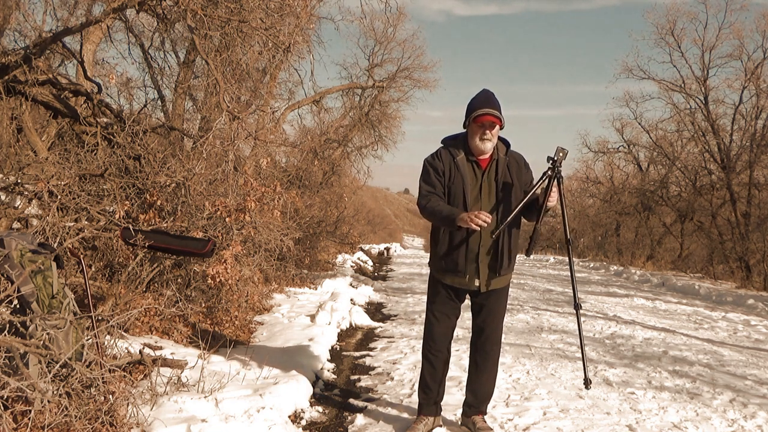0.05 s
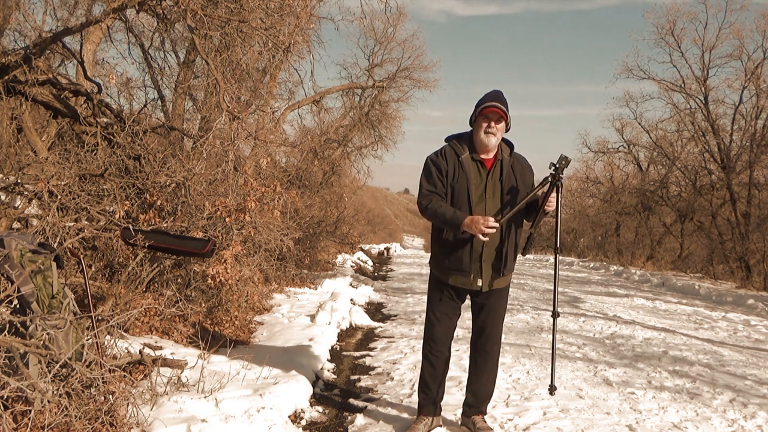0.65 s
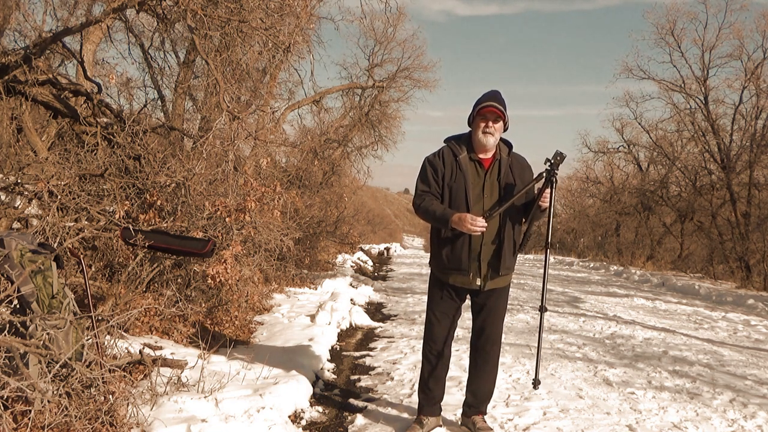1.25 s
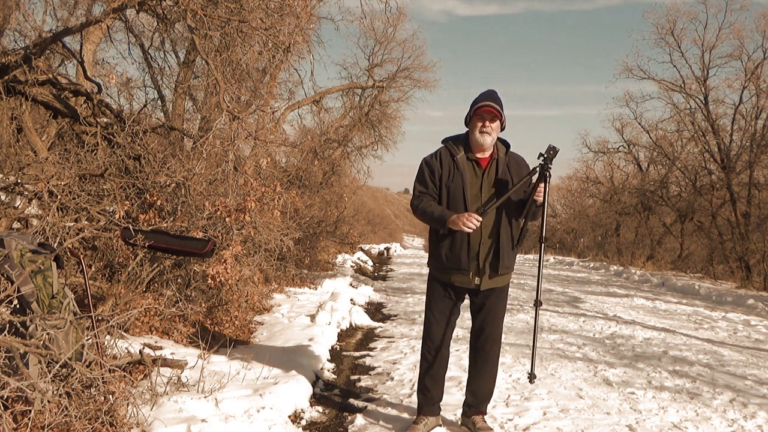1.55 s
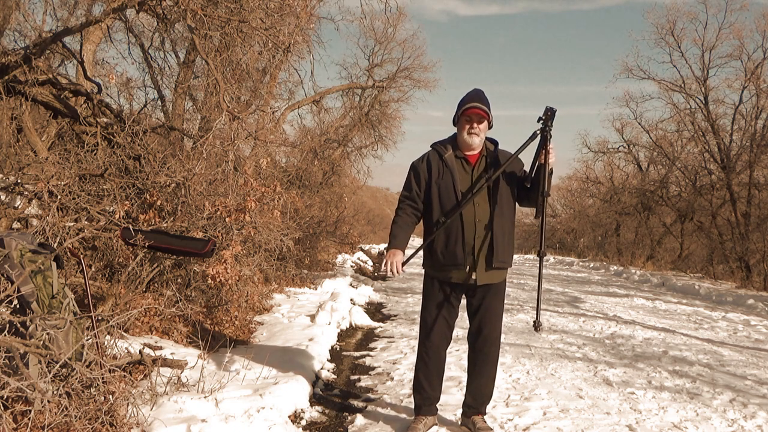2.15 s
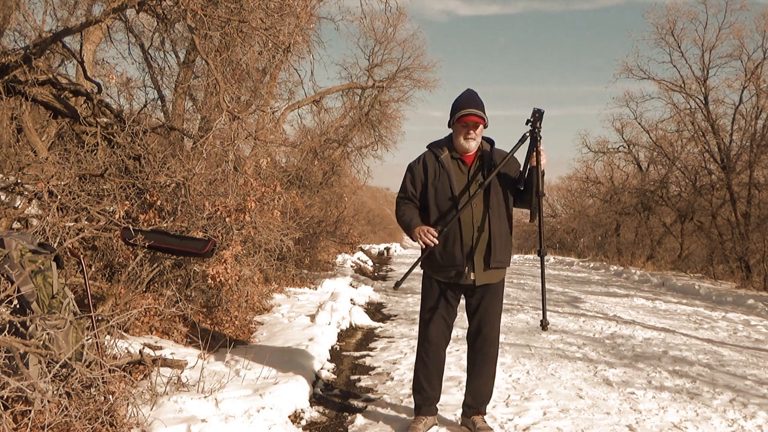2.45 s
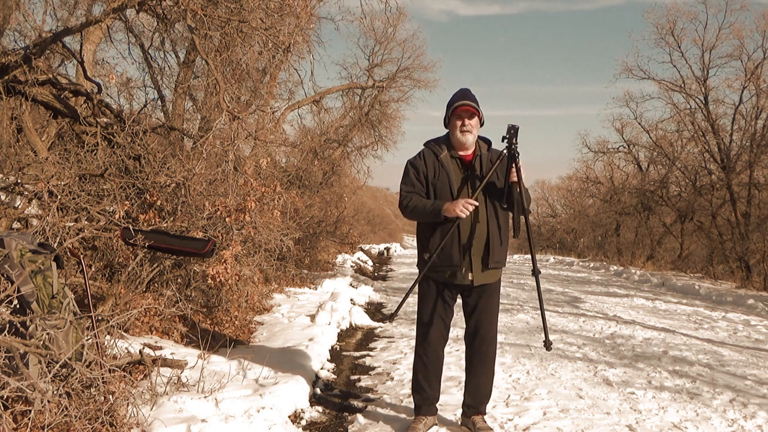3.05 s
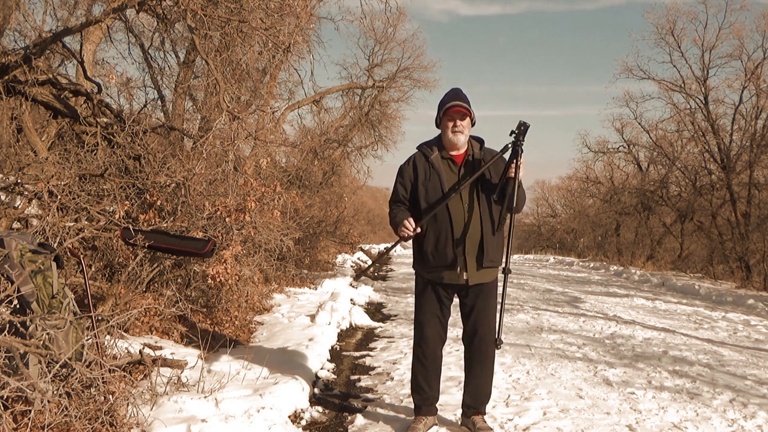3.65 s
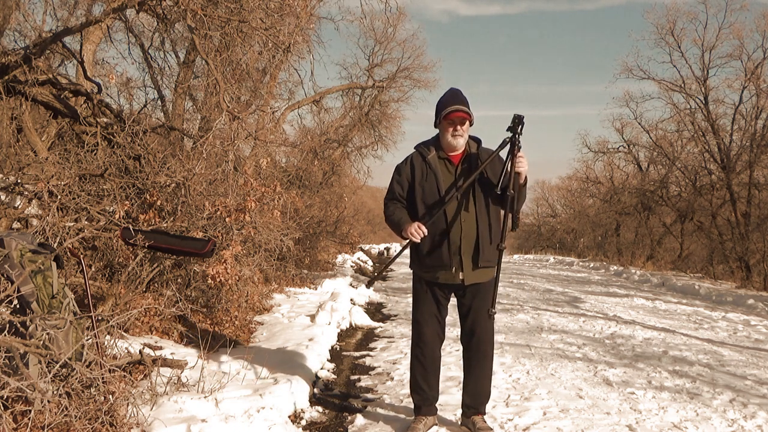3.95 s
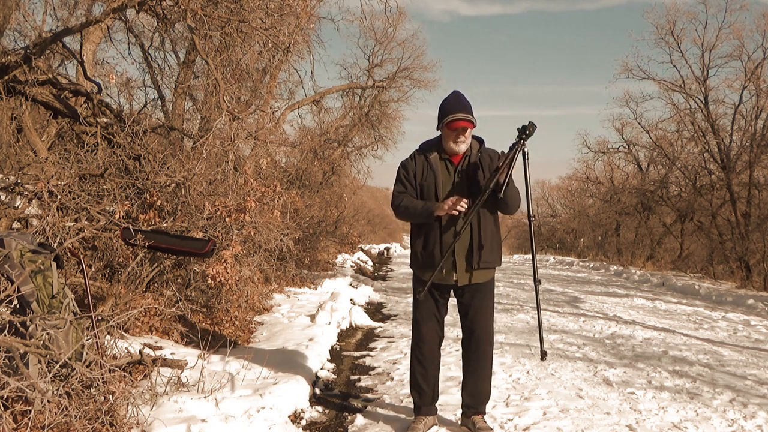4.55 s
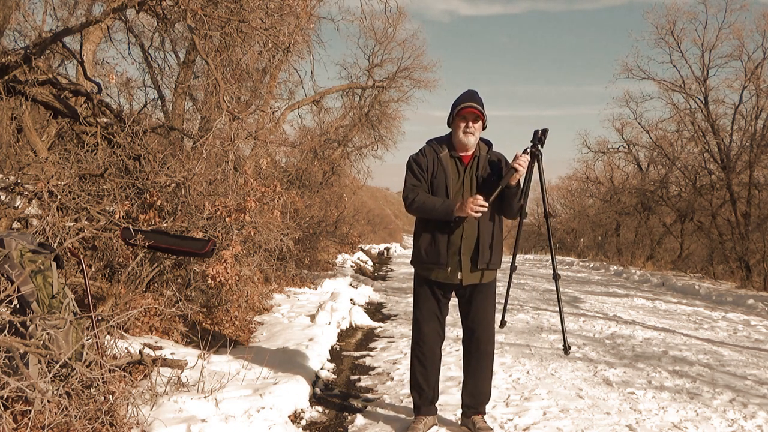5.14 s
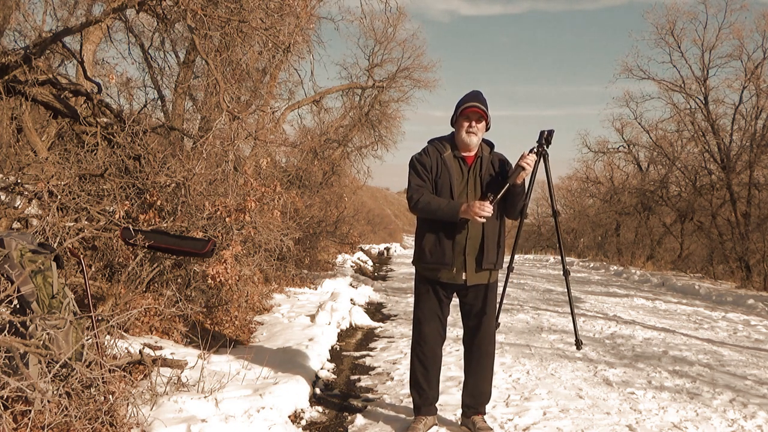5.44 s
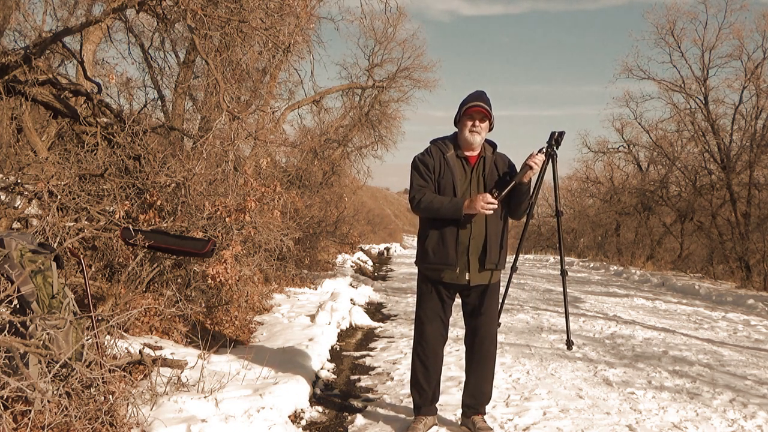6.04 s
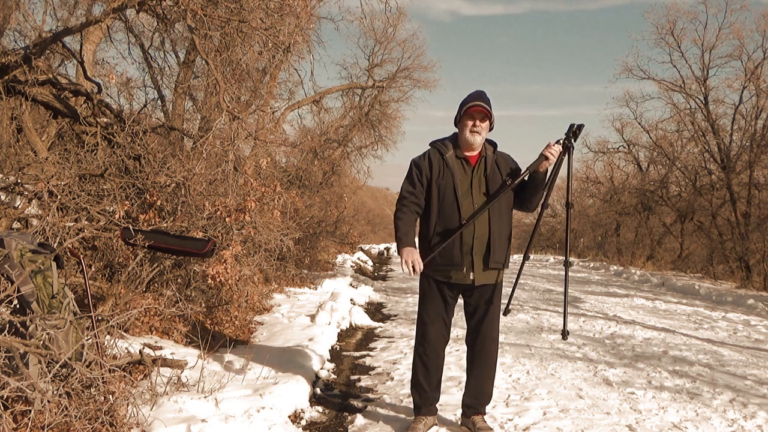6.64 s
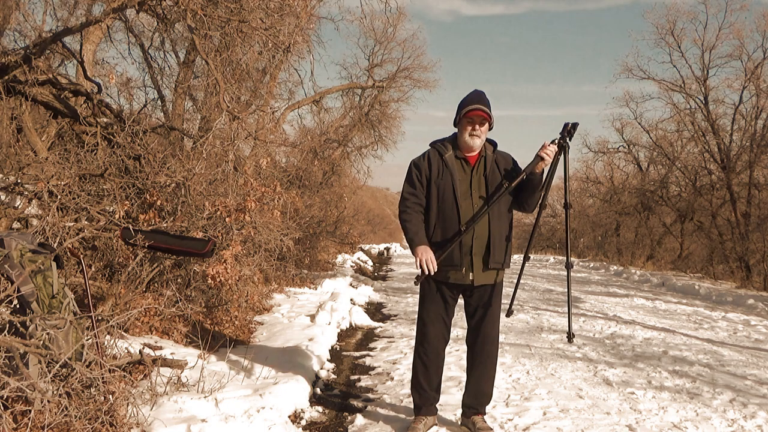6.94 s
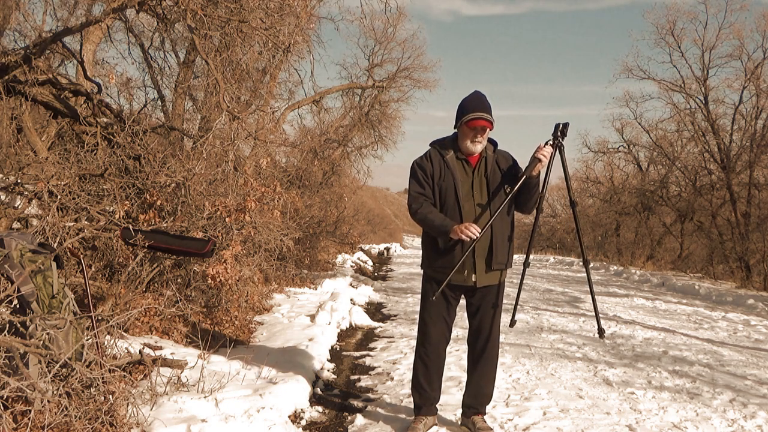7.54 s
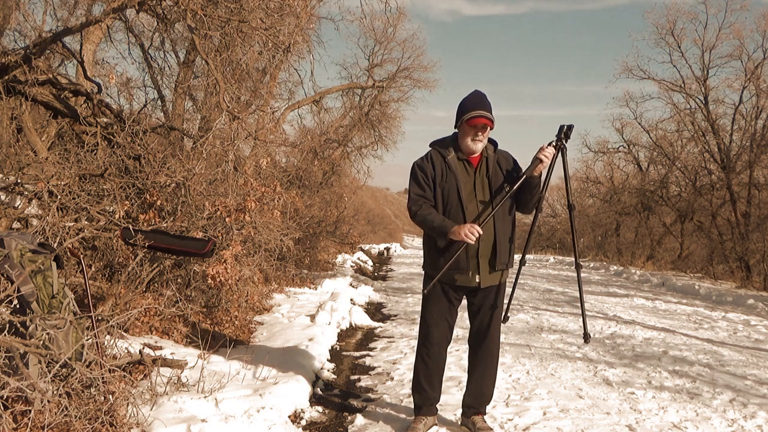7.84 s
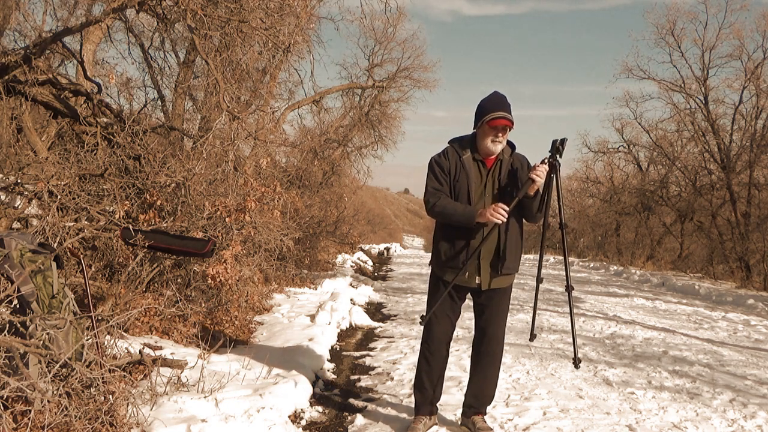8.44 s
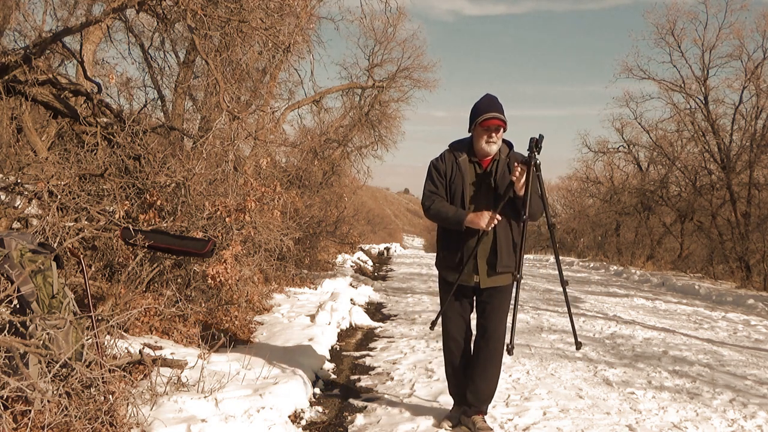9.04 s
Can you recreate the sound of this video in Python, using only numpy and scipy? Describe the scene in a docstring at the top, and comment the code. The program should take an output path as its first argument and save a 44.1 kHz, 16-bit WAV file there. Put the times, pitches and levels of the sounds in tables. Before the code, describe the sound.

An aluminium tripod is handled a few metres from the microphone on an outdoor path. After a couple of light clicks, one leg slides out with a brief hiss and hits its stop with a loud snap. Small lock clicks follow, then a second leg slides and snaps. Faint ticks and jacket swishes finish it. A quiet, steady hiss and a far traffic murmur lie underneath.

```python
"""Setting up a tripod in the snow

A few metres away, on a path among bare brush, an aluminium tripod's leg locks click and its tubes knock.
Two telescoping legs hiss out, tube rubbing in tube, and snap against their stops; a jacket swishes.
Twigs scatter a short tail back, and far traffic murmurs behind a steady hiss."""
import sys
import numpy as np
from scipy import signal
from scipy.fft import rfft, irfft, next_fast_len
from scipy.io import wavfile
from scipy.ndimage import uniform_filter1d

SR = 44100
rng = np.random.default_rng(int(sys.argv[2]) if len(sys.argv) > 2 else 0)


def generate_wav(signal):
    """Clip the signal to [-1, 1] and save it as 16-bit WAV at the path in sys.argv[1]."""
    frames = np.transpose(np.atleast_2d(signal))
    scaled = np.clip(frames, -1, 1) * 32767
    pcm = np.round(scaled).astype(np.int16)
    wavfile.write(sys.argv[1], SR, pcm)


N = 409688
TIME = np.arange(N) / SR

# Locks snapping and legs hitting their stops: start_s, level_db, thud_db, knock_db, top_db, crack_t60_s,
# part_pitch_hz, part_db, part_t60_s, housing_pitch_hz, housing_db, rebound_db
SNAPS = [ (0.6681, -37, -3, 2, -16, 0.03, 6030, -5.5, 0.19, 4800, 12.5, -17),
         (1.3022, -42.5, -5, 0.5, -8, 0.044, 4700, 2.5, 0.058, 1200, 4, -14),
         (2.0151, -7, -23, -8, -8, 0.049, 7600, -10, 0.067, 787, -7.5, -22),
         (2.0245, -7.5, -16.5, -9.5, -1.5, .04, 4540, -14, .06, 2640, -2.5, -26.5),
         (3.8557, -33, -36, -8, -50, 0.0099, 8500, -13, 0.056, 4770, 4, -21),
         (5.1489, -36.5, -14, -6, -18, 0.018, 6570, -6, .025, 5250, 6, -7.5),
         (6.0458, -22, -19, -9, -4, 0.014, 6780, -2, .018, 7600, 2, -13),
         (6.6601, -12.5, -13.5, -5.5, -4, 0.022, 8620, 0, 0.042, 1607, -1.5, -24),
         (7.9824, -35.5, -12, -5, -22, 0.0089, 5250, 0, .02, 4130, 8.5, -21.5),
         (9.103, -40, 8.5, -4, 2, 0.02, 1115, 7.5, 0.017, 392, 18, -13.5)]
# A leg held in the hand rings less: start_s, tube_ring_db
GRIP = [(0, -5.5), (3.5, -7), (5.5, -14.0), (7.5, -3)]

def snap_strokes():
    """A snap is four strokes: a light touch, the strike, a duller seating in the housing and a rebound."""
    for (start, db, thud_db, knock_db, top_db, t60,
         part_hz, part_db, part_t60, housing_hz, housing_db, rebound_db) in SNAPS:
        hard = thud_db, knock_db, top_db
        dull = thud_db + 6, knock_db + 6.5, top_db - 5
        seat_t60 = 1.3 * t60
        part = part_hz, part_db, part_t60
        housing = housing_hz, housing_db, seat_t60
        tube_db = [ring_db for since, ring_db in GRIP if since <= start][-1]
        yield start - .004, -51.5, hard, t60, tube_db, part
        yield start, db, hard, t60, tube_db, part
        yield start + .0027, db - 10, dull, seat_t60, tube_db, housing
        yield start + .0125, db + rebound_db, dull, t60, tube_db, part


# Loose parts and tubes touching once: start_s, level_db, pitch_hz, t60_s
TAPS = [(1.291, -53, 11200, .038), (1.377, -51, 7500, .037), (1.39, -46, 7200, 0.024),
        (1.4093, -47, 5800, 0.014), (3.011, -50.5, 7500, .008), (3.034, -45.5, 4540, 0.082),
        (5.0178, -45, 8070, .019), (5.9186, -51, 8000, .019), (7.8463, -51, 6930, .06),
        (8.3954, -46.5, 2120, .027), (8.7434, -50, 2560, 0.024), (8.825, -46, 7600, 0.038),
        (8.9202, -47, 7560, 0.024), (9.1652, -57, 2240, .06), (9.196, -44.5, 4980, .014),
        (9.2205, -47.5, 5530, 0.016), (9.2272, -59, 382, 0.0054), (9.261, -44.5, 5740, 0.016)]

def tap_strokes(middling_part_hz=5020, tube_db=-5):
    """A tap is one stroke: the smaller the part, the higher and thinner it sounds."""
    for start, db, part_hz, t60 in TAPS:
        octaves = np.log2(part_hz / middling_part_hz)
        thinness = max(octaves, -1.3)
        tone = -22 + 2 * thinness, -.5 - 10 * thinness, -18.5 + 23.5 * thinness   # thud, knock, top in dB
        yield start, db, tone, t60, tube_db, (part_hz, -1.5 - 6.5 * octaves, t60)


# Quickly damped resonances of the leg clamps: pitch_hz, width_hz, level_db
CLAMP_MODES = [(2582, 99, -11), (3800, 250, -4.5), (4800, 220, 0), (6138, 240.4, 5), (6820, 290, 11),
               (7880, 370, 11.5), (8470, 350, 5)]
# EQ shared by every crack: frequency_hz, level_db
CRACK_COLOUR = [(180, -18.5), (400, -8), (750, 0), (1600, -1.5), (4400, -1.5), (7800, 0), (10500, -1),
                (13000, -5.5), (15500, -16.5)]
EDGES_HZ = np.geomspace(24, 17500, 25)
# Filter bank: centre_hz, width_hz, bandpass
BANDS = [(np.sqrt(lo * hi), hi - lo, signal.butter(2, [lo, hi], "band", fs=SR, output="sos"))
         for lo, hi in zip(EDGES_HZ, EDGES_HZ[1:])]

def crack(t, t60, thud_db, knock_db, top_db):
    """Parts chatter for a moment and shake the clamp's dense, damped modes."""
    tint = [(750, thud_db), (1400, knock_db), (2900, knock_db), (4300, .01), (8300, .0038), (11500, top_db)]
    chatter_db = 1.5 * np.interp(t, np.linspace(0, t[-1], 500), rng.standard_normal(500))
    bursts = rng.standard_normal((2, len(t))) * dying(t, t60) * from_db(chatter_db) + 1e-18
    bursts = bursts + resonate(bursts, CLAMP_MODES)
    out = 0
    for k, (hz, width, bandpass) in enumerate(BANDS):
        if hz > CRACK_COLOUR[0][0]:
            band = signal.sosfilt(bandpass, bursts[k % 2])
            gain = np.sqrt(width) * from_db(at_hz(tint, hz) + at_hz(CRACK_COLOUR, hz))
            out = out + gain * band / np.linalg.norm(band)
    return out


# Ringing modes of the leg tubes: pitch_hz, level_db, t60_s
TUBE_MODES = [(2570, -27, 0.073), (3090, -27, 0.12), (4610, -17.5, 0.26), (4740, -25, .07),
              (5330, -17.5, 0.12), (6020, -19, .15), (6130, -17, .1), (7040, -19.5, .14),
              (7570, -25.5, .18), (8410, -15.5, 0.048), (8705, -15.5, 0.13), (9864, -27, .08)]

def tube_ring(t):
    """Each stroke excites the tubes' modes in a different balance."""
    strengths = from_db(rng.normal(0, 3.8, len(TUBE_MODES))) * rng.choice([-1, 1], len(TUBE_MODES))
    return sum(strength * from_db(db) * np.sin(2 * np.pi * hz * t) * dying(t, t60)
               for strength, (hz, db, t60) in zip(strengths, TUBE_MODES))


def contacts(crack_db, ring_db, part_db):
    """Every stroke layers a crack, the short note of the struck part and the ring of the tubes."""
    t, out = np.arange(SR // 5) / SR, np.zeros(N + SR)
    for start, db, tone, t60, tube_db, (note_hz, note_db, note_t60) in [*snap_strokes(), *tap_strokes()]:
        ring = from_db(ring_db + tube_db) * tube_ring(t)
        note = np.sin(2 * np.pi * note_hz * t) * dying(t, note_t60)
        note *= from_db(part_db + note_db) / np.linalg.norm(note)
        hit = from_db(crack_db) * crack(t, t60, *tone) + ring + note
        onset = int(start * SR)
        out[onset:onset + len(t)] += from_db(db) * hit
    return out[:N]


def radiated(x, low_hz, high_hz):
    """Thin tubes radiate no bass, and the highest treble fades on the way."""
    return signal.sosfilt(signal.butter(2, [low_hz, high_hz], "band", fs=SR, output="sos"), x)


# A leg running out, one list of breakpoints per leg: time_s, level_db, hump_centre_hz
LEG_RUNS = [
    [(1.58, -76, 7280), (1.714, -60.5, 7420), (1.812, -54.5, 7060), (1.85, -56.5, 7850),
     (1.93, -52.5, 8450), (1.966, -54.5, 7280), (2.005, -50.5, 6750)],
    [(6.26, -77, 6940), (6.336, -62, 7080), (6.4, -61, 7360), (6.546, -48.5, 9500), (6.59, -48, 7700),
     (6.614, -40, 7570), (6.652, -48.5, 7260)],
]
# How each leg fits its sleeve: hump_height_db, ring_db
LEG_FITS = [(4.5, -6.5), (10.0, -18)]
# EQ of the sliding hiss: frequency_hz, level_db
SLIDE_COLOUR = [(500, -23.5), (1500, -10), (3000, -7), (4000, -6), (5000, -2), (7500, -1), (9000, -2),
                (11000, -4.5), (13000, -7), (14000, -13.5), (15500, -21)]
# Tube resonances that friction excites: pitch_hz, width_hz, level_db
RUBBED_MODES = [(4654, 440, -4.5), (6190, 220, -0.5), (8400, 194, 4)]

def leg_slides(level_db, hump_width_octaves, hump_share=.62):
    """Tube rubs in tube and sings; the hiss has a bright hump that wanders and grows as the leg runs out."""
    slips = friction(grain_db=.5, judder_db=1.2)
    ring = rms_one(resonate(slips, RUBBED_MODES))
    hz, when, frames = signal.stft(rms_one(coloured(slips, SLIDE_COLOUR)), SR, nperseg=256)
    out = 0
    for run, (hump_db, ring_db) in zip(LEG_RUNS, LEG_FITS):
        times, db, centre_hz = np.transpose(run)
        octaves = np.log2((hz[:, None] + 1) / np.interp(when, times, centre_hz))
        growth = np.interp(when, [times[0], times[-1]], [.3, 1])   # share of the hump's full height
        hump = np.exp(-(octaves / hump_width_octaves) ** 2) - hump_share   # the rest of the hiss dips
        hiss = signal.istft(frames * from_db(hump_db * growth * hump), SR)[1][:N]
        moving = uniform_filter1d(1. * (TIME > times[0]) * (TIME < times[-1] + .01), size=300)
        envelope = moving * from_db(np.interp(TIME, times, db) + level_db)
        out = out + envelope * (hiss + from_db(ring_db) * ring)
    return out


# Faint squeaks: peak_s, half_length_s, level_db, pitch_hz, width_hz
SQUEAKS = [(1.788, 0.039, -67, 4630, 300), (1.92, .022, -56.5, 8500, 219), (3.36, .058, -69, 6270, 300),
           (6.616, .0065, -52, 3120, 500), (7.09, 0.083, -72.5, 8570, 280)]

def tube_squeaks():
    """A tube sings where it binds or a hand glides on it."""
    return swelling_tones(SQUEAKS, grain_db=.5, judder_db=-1.5)


# Sleeves brushing: peak_s, half_length_s, level_db
SWISHES = [(2.738, .11, -67.5), (3.353, 0.1, -65), (4.65, 0.2, -69.5), (5.405, .036, -68),
           (5.614, 0.048, -65), (7.26, 0.098, -69), (8.393, 0.064, -62.5), (8.852, 0.027, -58),
           (9.15, .087, -69)]
# EQ of the cloth: frequency_hz, level_db
CLOTH_COLOUR = [(500, -9), (1500, -4), (3500, -4), (7000, 0), (10000, -5.5), (15500, -26)]

def jacket(stir_from_s=3.3, stir_db=-80.5):
    """Each arm movement drags cloth over itself; in between it stirs faintly."""
    cloth = rms_one(coloured(friction(grain_db=1, judder_db=2.1), CLOTH_COLOUR))
    stirring = (TIME > stir_from_s) * from_db(stir_db + 5 * drift(rate_hz=4.1))
    swishes = sum(from_db(db) * swell(peak, half) for peak, half, db in SWISHES)
    return cloth * np.hypot(stirring, swishes)


# EQ of the scatter from the bushes: frequency_hz, level_db
BRUSH_COLOUR = [(200, -1), (800, 8), (3000, 3), (8000, -2.5), (15000, -8)]

def brush_scatter(x, t60, wet_db, side_db):
    """Countless twigs scatter each band's energy back as a noisy, dying tail."""
    t = np.arange(SR // 2) / SR
    tail = dying(t - .006, t60) * (1 - np.exp(-t / .0088))
    white, out = rng.standard_normal((2, 2, N)), 0
    for k, (hz, _, bandpass) in enumerate(BANDS):
        if hz > BRUSH_COLOUR[0][0]:
            power = signal.oaconvolve(signal.sosfilt(bandpass, x) ** 2, tail / tail.sum())[:N]
            noise = rms_one(signal.sosfilt(bandpass, white[k % 2]))
            out = out + np.sqrt(np.abs(power)) * from_db(at_hz(BRUSH_COLOUR, hz)) * noise
    mid, side = out
    return from_db(wet_db) * stereo(mid, from_db(side_db) * side)


# Swell of the far traffic: time_s, level_db
TRAFFIC_SWELL = [(0.0, -70), (0.82, -70.5), (5.46, -65.5), (5.69, -64), (7.55, -62.5), (8.05, -66.5),
                 (9.11, -63), (9.29, -65.5)]
# EQ of its murmur: frequency_hz, level_db
TRAFFIC_COLOUR = [(100, -23), (180, -21), (270, -6), (380, -1.5), (490, 0.5), (620, -1.5), (850, -10),
                  (1150, -24.5), (2500, -34)]

def traffic(level_db):
    """Far traffic blends into a low murmur that swells and wavers."""
    swell_db = np.interp(TIME, *np.transpose(TRAFFIC_SWELL))
    return from_db(level_db + swell_db + 1.1 * drift(rate_hz=7.4)) * wide_noise(TRAFFIC_COLOUR)


# Single far vehicles: peak_s, half_length_s, level_db, pitch_hz, width_hz
DRONES = [(3.5, 0.14, -70, 440, 220), (4.15, 0.11, -68.5, 497, 129.5), (5.8, 0.24, -66, 514, 180),
          (6.45, 0.22, -70.5, 356, 200), (7.4, 0.31, -67, 391.7, 218.4), (8.95, 0.17, -66, 427, 218)]

def vehicles(level_db):
    """Now and then one vehicle drones out of the murmur."""
    return from_db(level_db) * swelling_tones(DRONES, grain_db=5.5, judder_db=-1.5)


# EQ of the open air: frequency_hz, level_db
AIR_COLOUR = [(15, -53.5), (25, -24.5), (70, -10), (161, -11), (299, -8.5), (333, -11), (437, -13),
              (620, -9), (905, -1.5), (981, -7.5), (1730, -10.5), (3130, -13), (3680, -14.5), (9720, -17.5),
              (15800, -24.5)]

def open_air(level_db):
    """An even bed of hiss lies under everything."""
    return from_db(level_db) * wide_noise(AIR_COLOUR)


# Stereo width of the mix, nearly mono in the bass and highest treble: frequency_hz, side_gain_db
WIDTH = [(60, -24.5), (110, -25.5), (200, -17.5), (380, -17), (700, -9), (1290, -1), (2380, -2.5),
         (4400, -4.5), (8120, -14.5), (15000, -47)]

def stereo(mid, side):
    """Mid and side to left and right, with the width curve on the side."""
    return mid + coloured(side, WIDTH) * [[1], [-1]]


def wide_noise(spectrum):
    """Stereo noise from all around."""
    mid, side = (rms_one(coloured(rng.standard_normal(N), spectrum)) for _ in range(2))
    return stereo(mid, side)


def microphone_pair(x, pan_db, unlike_db, t60):
    """Reflections off the housing colour the two capsules a little differently."""
    t = np.arange(128) / SR
    housing = rng.standard_normal(len(t)) * dying(t, t60)
    side = from_db(unlike_db) * signal.lfilter(housing / np.linalg.norm(housing), 1, x)
    return x * from_db([[-pan_db], [pan_db]]) + side * [[1], [-1]]


def friction(grain_db, judder_db):
    """Countless tiny slips, bunched unevenly: noise with a fast and a slow flutter."""
    return rng.standard_normal(N) * from_db(grain_db * drift(900) + judder_db * drift(70))


def swelling_tones(rows, grain_db, judder_db):
    """Grainy noise feeds one resonance per row, swelling and fading."""
    noise, out = friction(grain_db, judder_db), 0
    for peak, half, db, hz, width in rows:
        mode = [(hz, width, 0)]
        tone = rms_one(resonate(resonate(noise, mode), mode))
        out = out + from_db(db) * swell(peak, half) * tone
    return out


def resonate(x, modes):
    """Parallel resonances, each peaking at its own level."""
    return sum(from_db(db) * signal.lfilter(*signal.iirpeak(hz, hz / width, fs=SR), x)
               for hz, width, db in modes)


def coloured(x, spectrum):
    """EQ steady noise, rolling off below the curve's first point."""
    size = next_fast_len(len(x))
    hz = np.maximum(np.fft.rfftfreq(size, 1 / SR), 1)
    low_cut = np.minimum(hz / spectrum[0][0], 1) ** 2
    return irfft(rfft(x, size) * from_db(at_hz(spectrum, hz)) * low_cut, size)[:len(x)]


def at_hz(spectrum, hz):
    """Read an EQ curve on a log-frequency axis."""
    points_hz, db = np.transpose(spectrum)
    return np.interp(np.log(hz), np.log(points_hz), db)


def swell(peak_s, half_s):
    """A bell-shaped rise and fall around a moment."""
    return np.exp(-np.minimum(((TIME - peak_s) / half_s) ** 2 / 2, 20))


def dying(t, t60):
    """Exponential decay that starts at t = 0."""
    return (t >= 0) * np.exp(-np.log(1000) * np.maximum(t, 0) / t60)


def drift(rate_hz):
    """Glide between random values of spread 1."""
    knots = rng.standard_normal(N // 16)
    return np.interp(TIME * rate_hz, np.arange(len(knots)), knots)


def from_db(db):
    """Decibels to gain."""
    return 10 ** (np.asarray(db) / 20)


def rms_one(x):
    """Scale to rms 1."""
    return x / np.sqrt(np.mean(x ** 2) + 1e-30)


def scene():
    """The tripod stands slightly to the right, with brush and far traffic all around."""
    hits = radiated(contacts(crack_db=-21, ring_db=-14.5, part_db=12.5), low_hz=278.3, high_hz=13500)
    tripod = hits + leg_slides(level_db=-.55, hump_width_octaves=.38) + jacket() + tube_squeaks()
    scatter = brush_scatter(tripod, t60=.14, wet_db=-20, side_db=-1.5)
    background = traffic(level_db=-.5) + open_air(level_db=-66) + vehicles(level_db=1)
    near = microphone_pair(tripod, pan_db=.35, unlike_db=-21, t60=.003)
    return near + scatter + background


def record(dry, low_cut_hz=40, high_cut_hz=15850):
    """Rumble is rolled off and the top is cut steeply."""
    lean = signal.sosfilt(signal.butter(2, low_cut_hz, "high", fs=SR, output="sos"), dry)
    return signal.sosfilt(signal.ellip(10, .1, 80, high_cut_hz, fs=SR, output="sos"), lean)


dry = scene()
out = record(dry)
generate_wav(out)
```